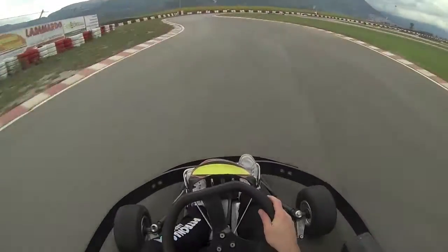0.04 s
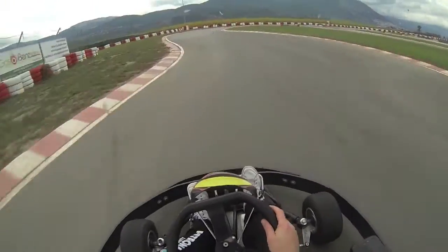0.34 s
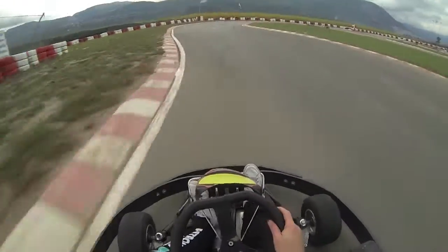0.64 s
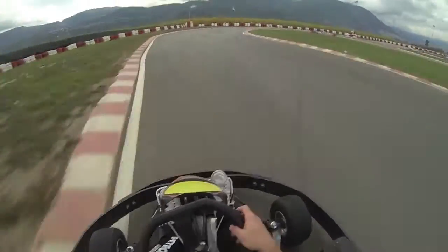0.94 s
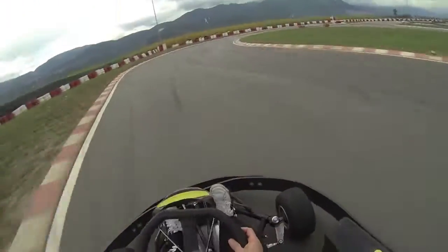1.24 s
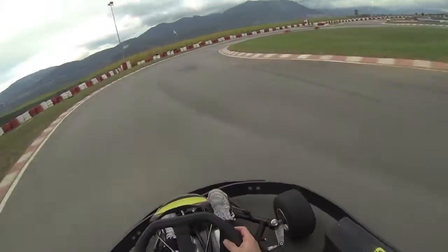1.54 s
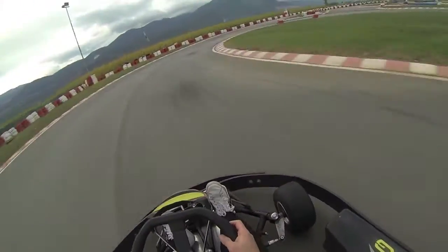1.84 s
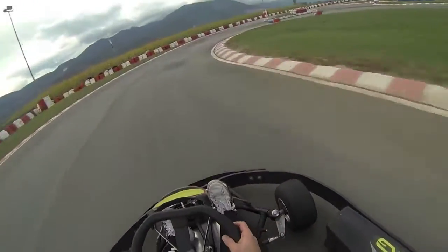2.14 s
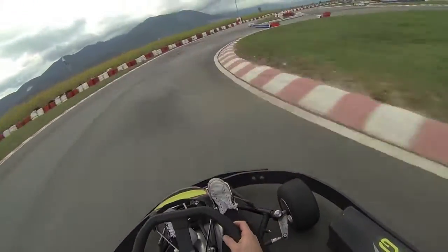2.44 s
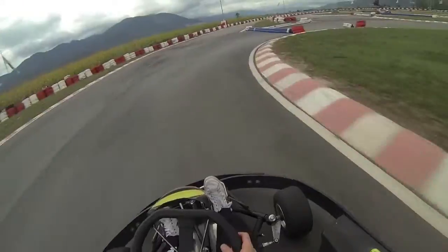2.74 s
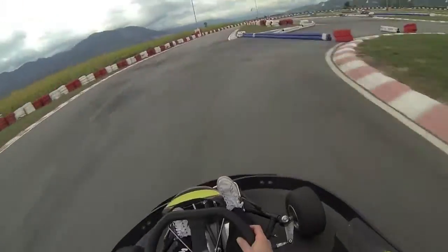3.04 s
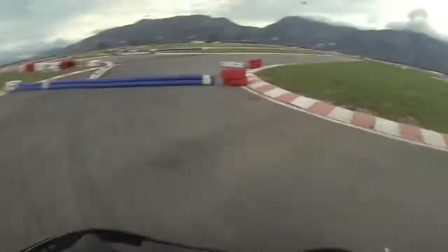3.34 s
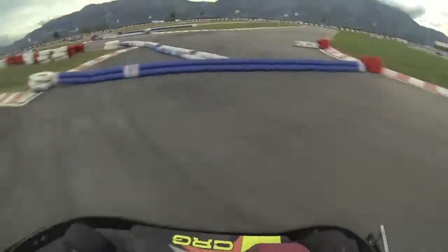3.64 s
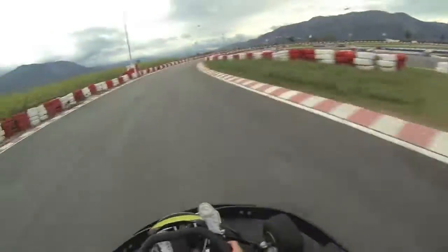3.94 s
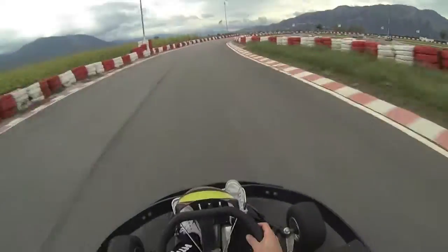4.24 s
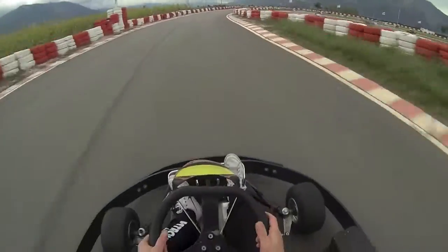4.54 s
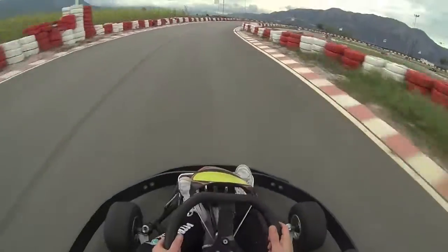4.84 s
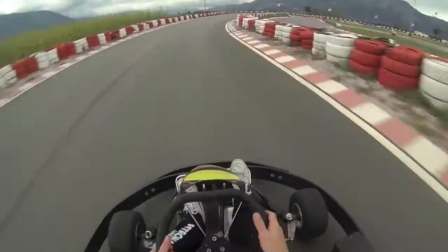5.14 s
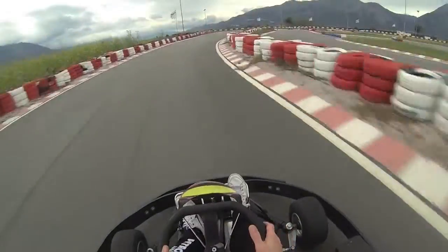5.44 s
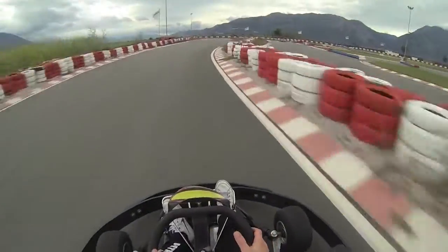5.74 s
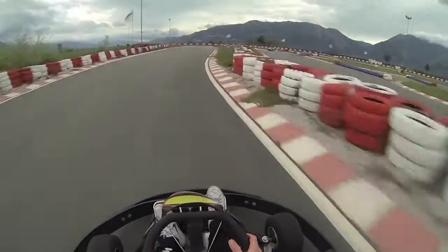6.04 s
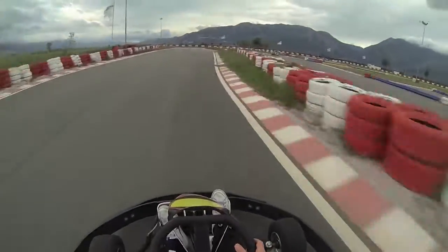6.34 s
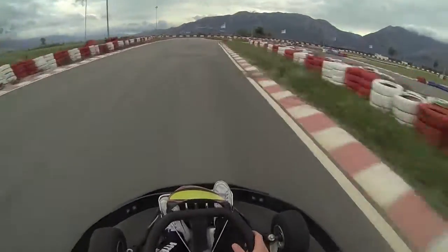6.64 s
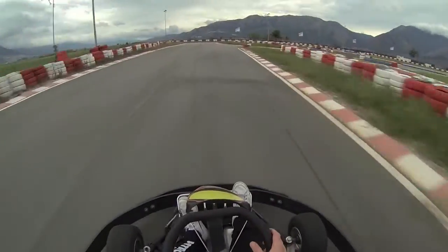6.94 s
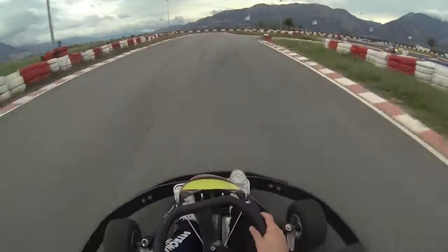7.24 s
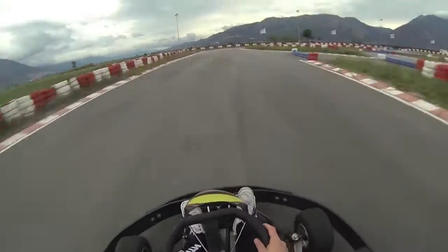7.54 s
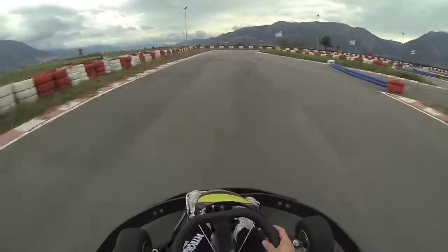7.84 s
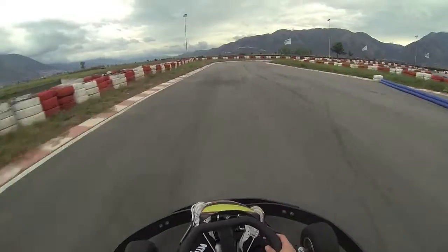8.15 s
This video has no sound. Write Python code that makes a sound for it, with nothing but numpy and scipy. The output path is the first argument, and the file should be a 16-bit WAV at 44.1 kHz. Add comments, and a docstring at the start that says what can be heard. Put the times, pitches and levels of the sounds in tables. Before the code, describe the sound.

Wind rumbles on a helmet microphone over the deep, wavering throb of a four-stroke go-kart lapping an open-air track. Loose parts chatter throughout, hollow and bright, along with engine knocks and gritty exhaust puffs. After a short early dip in the revs, occasional low thumps briefly duck the sound, and two faint squeaks pass near the middle. The pitch creeps upward until the driver eases off just before the end.

```python
"""A single-cylinder four-stroke go-kart laps a track, heard from a camera on the driver's helmet.
From the start the engine throbs, puffs and knocks, its vibration rattles plastic and chain, and wind
buffets the microphone. At 1.1 s the throttle lifts briefly; then come scattered hard jolts that duck
the camera's limiter. From 3.2 s the driver glances back and two tiny squeaks sound. The revs climb
slowly until the throttle lifts again at 7.5 s."""
import sys
import numpy as np
from scipy.fft import rfft, irfft, next_fast_len
from scipy.io import wavfile
from scipy.ndimage import uniform_filter1d, map_coordinates

SR = 44100
rng = np.random.default_rng(int(sys.argv[2]) if len(sys.argv) > 2 else 0)


def unload_wav(signal):
    """Save mono or channel-first audio to the path in sys.argv[1] as 16-bit WAV at rate SR, clipped to [-1, 1]."""
    wavfile.write(
        sys.argv[1],
        SR,
        np.round(np.clip(np.atleast_2d(signal).T, -1, 1) * 32767).astype(np.int16),
    )


N = 365130
TIME = np.arange(N) / SR


def amp(db):
    """Decibels to gain."""
    return 10 ** (np.asarray(db) / 20)


def unit(x):
    """x at rms 1."""
    return x / np.sqrt(np.mean(x ** 2) + 1e-20)


def curves(rows):
    """One automation curve for each column after the time."""
    times, *columns = np.transpose(rows)
    return [np.interp(TIME, times, column) for column in columns]


def wobble(rate):
    """Smooth random modulation, rate knots a second."""
    return map_coordinates(rng.standard_normal(int(N * rate / SR) + 4), [TIME * rate])


def bump(t, half_width):
    """A bell-shaped envelope centred on t."""
    return np.exp(-((TIME - t) / half_width) ** 2)


def filtered(x, response):
    """x times a complex response of frequency."""
    size = next_fast_len(N + SR // 2)
    return irfft(rfft(x, size) * response(np.fft.rfftfreq(size, 1 / SR)), size)[:N]


def coloured(x, eq):
    """x through an EQ curve (f/Hz, level/dB), at rms 1."""
    hz, db = np.transpose(eq)
    return unit(filtered(x, lambda f: amp(np.interp(np.log(f + 1), np.log(hz), db))))


def ringing(x, modes):
    """x through resonators (f/Hz, width/Hz, level/dB) of alternating polarity, at rms 1."""
    def response(f):
        return sum((-1) ** k * amp(db) * 1j * f * width / (hz * hz - f * f + 1j * f * width)
                   for k, (hz, width, db) in enumerate(modes))
    return unit(filtered(x, response))


def strokes(turns, scatter_db):
    """One impulse of varying size each time the count passes a whole number."""
    hits = np.flatnonzero(np.diff(np.floor(turns)) > 0)
    sizes = amp(scatter_db * rng.uniform(-0.94, 1, N)[:len(hits)])
    return np.bincount(hits, sizes, N)


def impacts(per_second, scatter_db):
    """Dense tiny collisions of random size and sign."""
    hits = rng.random(N) < per_second / SR
    return unit(hits * rng.choice([-1, 1], N) * amp(scatter_db * rng.standard_normal(N)))


def blowdown(cycle, rise, fall):
    """Pressure after the exhaust valve opens: a quick rise and a slow fall, in shares of a cycle."""
    phase = cycle % 1
    return unit((1 - np.exp(-phase / rise)) * np.exp(-phase / fall))


# Wind faders: t/s, buffet level/dB, rumble level/dB
WIND_FADERS = [(0.0, -41, -40.5), (0.5, -24, -40.5), (0.74, -18.5, -35.5), (1.22, -20, -32),
               (1.74, -21, -36.5), (2.02, -22, -37.5), (2.2, -15, -46), (2.66, -27.5, -37.5),
               (2.92, -24, -39.5), (3.3, -31, -43), (3.64, -17, -31.5), (3.82, -23.5, -42),
               (4.04, -21, -42), (4.4, -24.5, -36.5), (5.2, -24.5, -41), (5.36, -19.5, -38),
               (5.66, -28, -33.5), (6.04, -21.5, -37.5), (6.18, -23, -37), (7.0, -24, -35),
               (7.42, -17, -35.5), (7.8, -30, -34.5), (8.06, -17.5, -33), (8.26, -23, -34.5)]
# Sub-bass buffeting and the low roar above it: f/Hz, level/dB
BUFFET_EQ = [(4, -1), (11, 1), (21, -8), (32, -0.5), (50, -11), (80, -43), (200, -86)]
RUMBLE_EQ = [(20, 5), (45, 8), (65, 9.5), (110, 4), (160, 3), (220, -8), (500, -9.5), (1200, -62)]
def wind():
    """Turbulence round the helmet lays a bed of slow buffeting and fluttering rumble."""
    buffet_db, rumble_db = curves(WIND_FADERS)
    buffet = coloured(rng.standard_normal(N), BUFFET_EQ)
    flutter = amp(2.7 * wobble(25))
    rumble = coloured(flutter * rng.standard_normal(N), RUMBLE_EQ)
    return amp(buffet_db + 2) * buffet + amp(rumble_db + 4) * rumble


# Pressure thumps: t/s, level/dB, half-width/s
THUMPS = [(1.272, -1, 0.0082), (1.553, 1, 0.0047), (2.048, -0.5, 0.006), (2.91, 0.5, 0.0053),
          (4.071, -0.5, 0.01), (6.243, -0.5, 0.0069), (7.426, 3.5, .006)]
def jolts():
    """Each hard jolt pushes one pulse of air into the microphone."""
    return sum(amp(db) * bump(t, half_width) for t, db, half_width in THUMPS)


# Tiny squeaks: t/s, f/Hz, level/dB, half-width/s
SQUEAKS = [(3.27, 3620, -31, 0.011), (3.802, 3640, -32.5, 0.016)]
def squeaks():
    """Rubbing gives short chirps with an unsteady pitch."""
    warped_time = np.cumsum(1 + 0.0129 * wobble(220)) / SR
    return sum(amp(db) * bump(t, half_width) * np.sin(2 * np.pi * hz * warped_time)
               for t, hz, db, half_width in SQUEAKS)


# Rattle faders: t/s, hollow level/dB, bright level/dB
RATTLE_FADERS = [(0.0, -29.0, -40), (0.34, -31, -41.0), (0.44, -24, -34.5), (0.58, -27.5, -39.0),
                 (0.88, -28.5, -37), (0.98, -22.5, -33.5), (1.08, -23.5, -31.5), (1.14, -27, -37.5),
                 (1.26, -20, -31), (1.32, -27, -35.5), (1.48, -21, -32.5), (1.6, -26.5, -35.5),
                 (1.74, -23.5, -33.5), (1.84, -30, -43.5), (1.92, -25.5, -34.5), (2.3, -29, -38),
                 (2.46, -23.5, -33.5), (2.56, -22.5, -29), (2.74, -32, -44), (2.84, -22.5, -35),
                 (2.92, -30.5, -35.5), (2.96, -32, -45), (3.12, -26.0, -33.5), (3.22, -34, -40),
                 (3.28, -28.5, -36.0), (3.34, -33.5, -42.5), (3.44, -34.5, -40), (3.6, -24.5, -31.5),
                 (3.72, -37, -41.5), (3.8, -32.0, -38.5), (3.92, -31.5, -40), (4.02, -25.5, -35.5),
                 (4.12, -31.5, -41), (4.38, -23.5, -33), (4.6, -31, -38.5), (4.76, -24.0, -33),
                 (4.86, -29, -39.0), (5.02, -27.0, -35), (5.08, -30.5, -39.5), (5.24, -27, -36.5),
                 (5.4, -20, -27.5), (5.46, -25.5, -36.5), (5.6, -29.5, -37), (5.74, -20.5, -30.5),
                 (5.8, -29, -39), (5.9, -23, -33), (6.0, -27.5, -35.5), (6.22, -17.5, -29.5),
                 (6.3, -25.5, -35), (6.42, -28, -38.5), (6.62, -19, -27.5), (6.68, -26.5, -36),
                 (6.76, -21.0, -30), (6.9, -17, -29.5), (6.96, -25.5, -35.0), (7.06, -18.5, -30.5),
                 (7.14, -22.5, -34.5), (7.38, -21, -29.5), (7.5, -25, -34.5), (7.64, -22, -28.5),
                 (7.8, -28.5, -36.5), (8.0, -22, -30.5), (8.2, -31, -36), (8.26, -24.5, -34)]
# Hollow ring of the plastic shell: f/Hz, width/Hz, level/dB
SHELL_MODES = [(1295, 91, -3), (1435, 154, 9), (1780, 420, -4)]
# Bright ring of the camera housing, colouring both rattle and exhaust hiss: f/Hz, width/Hz, level/dB
HOUSING_MODES = [(2173, 90, 4.5), (2388, 85, 2), (2820, 111, -1), (3430, 160, 0), (3808, 153, -3.5),
                 (4563, 146, -3), (4840, 130, -2.5), (5087, 155, 0), (5660, 590, -10.5), (6370, 520, -12),
                 (7310, 390, -17), (8650, 270, -25.5), (9860, 580, -21.5), (10730, 690, -21)]
# Broad, dry clatter: f/Hz, level/dB
CLATTER_EQ = [(100, -7), (160, 1.5), (230, -3), (380, 0), (620, -5), (850, 0.5), (1900, -2), (2600, -6),
              (4300, -16.5), (6000, -21), (9000, -34.5), (15000, -52)]
def rattle(cycle, throttle):
    """Loose parts chatter in uneven flurries, pushed harder just after each firing."""
    hollow_db, bright_db = curves(RATTLE_FADERS)
    shove = throttle * blowdown(cycle, rise=0.032, fall=0.35)
    flurry = amp(1.24 * wobble(28) + 1.09 * wobble(170))
    shell = ringing(flurry * (1 + 0.18 * shove) * impacts(3000, scatter_db=1), SHELL_MODES)
    housing = ringing(flurry * (1 + 0.33 * shove) * impacts(5000, scatter_db=2.5), HOUSING_MODES)
    bright_eq = [(1000, -13), (2000, 1), (10800, -0.5), (12000, -5), (14000, -12), (15300, -26)]
    bright = coloured(housing, bright_eq)
    clatter = coloured(flurry * (1 + 0.22 * shove) * impacts(5000, scatter_db=2.5), CLATTER_EQ)
    return amp(hollow_db) * shell + amp(bright_db) * bright + amp(bright_db + 3) * clatter


# Head turn towards the engine: t/s, turn/0-1
GLANCE = [(3.2, 0), (3.45, 0.77), (3.62, 0.9), (3.85, 0)]
# Exhaust hiss, shaded by the head and heard side-on: f/Hz, level/dB
SHADED_EQ = [(1500, -2.5), (3500, -4), (5000, -3.5), (7000, 5.5), (10500, 9), (11800, 6), (14200, -6),
             (15300, -18)]
SIDE_ON_EQ = [(2000, 0), (5100, 1.5), (6500, 1.5), (7600, -2), (11000, -12), (13300, -9), (15000, -30)]
def puffs(cycle, throttle, level_db):
    """Each firing ends in a gritty hiss of gas, which changes colour as the head turns."""
    glance = curves(GLANCE)[0]
    gate = unit(0.43 + throttle * blowdown(cycle, rise=0.043, fall=0.21))
    grit = ringing(gate * impacts(9000, scatter_db=0.5), HOUSING_MODES)
    shaded = amp(level_db + 8) * (1 - 0.7 * glance) * coloured(grit, SHADED_EQ)
    # side-on, the treble arrives directly and once off the shoulder; the lag shrinks as the head turns
    hiss = gate * rng.standard_normal(N)
    lag_samples = SR / (5100 + 1550 * glance)
    flanged = hiss + 0.7 * map_coordinates(hiss, [np.arange(N) - lag_samples])
    return shaded + amp(-42.5) * glance * coloured(flanged, SIDE_ON_EQ)


# Ring of the engine casing: f/Hz, width/Hz, level/dB
CASING_MODES = [(909, 47, -1.5), (994, 28, -4), (1072, 36, 0.5), (1356, 67, -3.5), (2147, 65, -12)]
def knock(cycle, throttle, level_db):
    """Valve knocks ring the casing once per crank turn, twice per firing, favouring the even orders."""
    loose = cycle + 0.0039 * wobble(60)
    light = strokes(loose + 0.1016, scatter_db=2.5)
    heavy = 1.5 * strokes(loose + 0.6, scatter_db=4.5)
    casing = ringing(light + heavy, CASING_MODES)
    tone = coloured(casing, [(400, -6), (850, -6.5), (2300, 0), (4000, -24)])
    return amp(level_db - 2.5) * (0.63 + 0.72 * throttle) * tone


# Low-mid body of the silencer: f/Hz, width/Hz, level/dB
SILENCER_MODES = [(170, 96, -12), (274.8, 23, 1), (382.3, 18.6, 0.5), (412.2, 22.6, 2.5), (510, 37, -13)]
def silencer(cycle, throttle, level_db):
    """One exhaust pulse per firing rings the silencer, louder on an open throttle."""
    pipe = ringing(strokes(cycle + 0.0994, scatter_db=3.5), SILENCER_MODES)
    tone = coloured(pipe, [(90, -22), (200, -2), (480, -0.5), (800, -16)])
    return amp(level_db - 1.5) * throttle * tone


# Fader for the engine's fundamental: t/s, level/dB
THROB_FADER = [(0.0, -13), (0.86, -17.5), (1.22, -23.5), (1.56, -15.5), (1.94, -19.5), (2.92, -14),
               (3.04, -19), (3.14, -13.5), (3.44, -15), (3.54, -21.5), (3.82, -16.5), (4.24, -21.0),
               (4.42, -14.5), (5.16, -14), (5.3, -23), (5.42, -15), (6.14, -19), (6.26, -12), (6.54, -21.5),
               (6.76, -22), (6.92, -14.5), (7.32, -18.5), (7.42, -16), (7.56, -26), (7.78, -11),
               (7.88, -24), (8.16, -12.5), (8.26, -22)]
def throb(cycle):
    """A deep, wavering tone at the firing rate, with a faint octave above."""
    angle = 2 * np.pi * (cycle + 0.038 * wobble(13))
    fundamental = amp(curves(THROB_FADER)[0] + 1.5) * np.sin(angle)
    octave = amp(-33.5 + 1.9 * wobble(5.1)) * np.sin(2 * angle)
    return fundamental + octave


# Engine faders: t/s, silencer level/dB, knock level/dB, puff level/dB
ENGINE_FADERS = [(0.0, -39, -38.5, -59), (0.84, -34.5, -35.5, -59.5), (1.02, -33.5, -29.5, -53),
                 (1.28, -34, -32, -51), (1.72, -32, -30.5, -48), (2.24, -33.5, -33.5, -53),
                 (2.5, -30.5, -29.5, -49), (3.22, -35, -40, -54), (3.36, -39.5, -36.5, -61),
                 (3.58, -32.5, -29.5, -54), (3.9, -37, -39, -52), (4.16, -38, -38, -55),
                 (4.34, -32, -32, -54.0), (5.06, -38, -41, -65), (5.34, -32, -29, -50),
                 (5.86, -36, -40, -58), (6.18, -32, -32.5, -47.5), (6.4, -37.5, -45, -57),
                 (6.84, -28, -39, -52), (8.26, -36, -39, -72)]
def engine(cycle, throttle):
    """The single cylinder drives four layers, all locked to its firing cycle."""
    silencer_db, knock_db, puff_db = curves(ENGINE_FADERS)
    return (throb(cycle) + silencer(cycle, throttle, silencer_db)
            + knock(cycle, throttle, knock_db) + puffs(cycle, throttle, puff_db))


# Firing rate of the cylinder: t/s, f/Hz
FIRING_RATE = [(0, 37.4), (.35, 37.9), (.7, 38.3), (1, 39.2), (1.15, 38.1), (1.4, 37.05), (1.65, 37.5),
               (2, 37.55), (2.3, 37.8), (2.6, 37.6), (2.85, 38.35), (3.2, 37.95), (3.6, 38.25), (4.3, 39),
               (4.7, 39.4), (5.1, 39.65), (5.5, 40.03), (7, 41.23), (7.55, 41.57), (7.7, 41), (8, 39.3),
               (8.28, 39)]
# The driver's pedal: t/s, opening/0-1
THROTTLE = [(0, 1), (1.1, 1), (1.2, 0.3), (1.53, 0.47), (1.62, 1), (7.52, 0.76), (7.66, 0.1), (8.28, 0.4)]
def scene():
    """The firing cycle drives engine and rattle; squeaks, wind and jolts join them in mono."""
    cycle = np.cumsum(curves(FIRING_RATE)[0]) / SR + 0.0361
    throttle = curves(THROTTLE)[0]
    return (engine(cycle, throttle) + rattle(cycle, throttle) + squeaks() + wind() + jolts())[None]


def limiter(x, ceiling_db, recovery_db_per_s):
    """Gain ducks at once when the pressure passes the ceiling, then recovers steadily."""
    level = np.abs(uniform_filter1d(x, size=64))
    over_db = np.maximum(20 * np.log10(level + 1e-9) - ceiling_db, 0)
    release_db = recovery_db_per_s * TIME
    duck_db = np.maximum.accumulate(over_db + release_db) - release_db
    return x * amp(-uniform_filter1d(duck_db, size=128))


def record(dry):
    """The camera limits the peaks, blocks steady pressure and cuts off the highest treble."""
    low_cut_hz, high_cut_hz = 2, 15300
    limited = limiter(dry[0], ceiling_db=-8.5, recovery_db_per_s=98)
    return filtered(limited, lambda f: (f < high_cut_hz) * 1j * f / (low_cut_hz + 1j * f))[None]


dry = scene()
out = record(dry)
unload_wav(out)
```